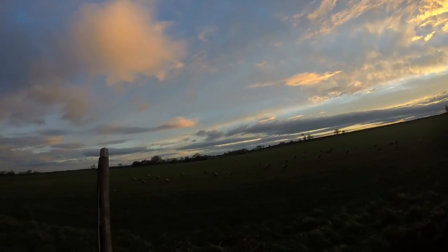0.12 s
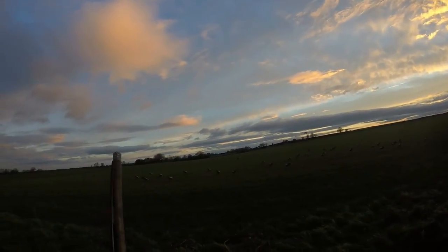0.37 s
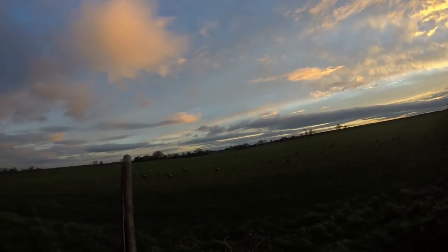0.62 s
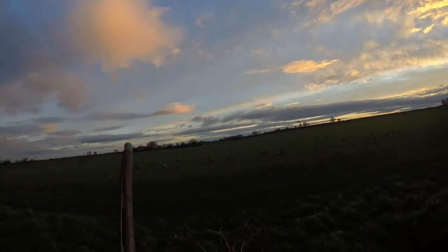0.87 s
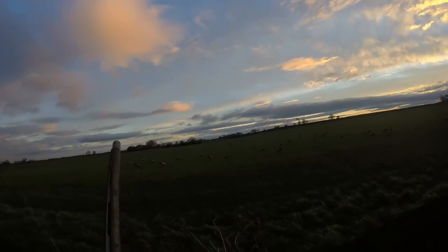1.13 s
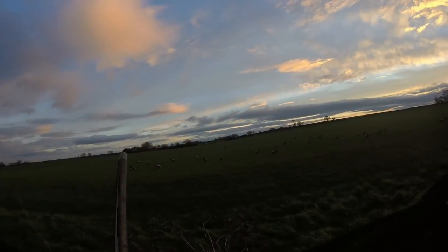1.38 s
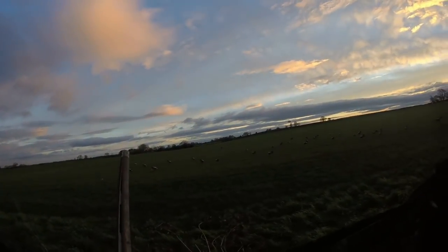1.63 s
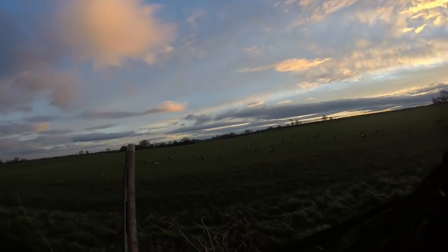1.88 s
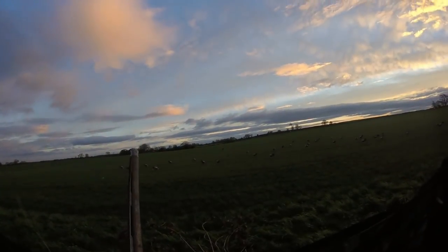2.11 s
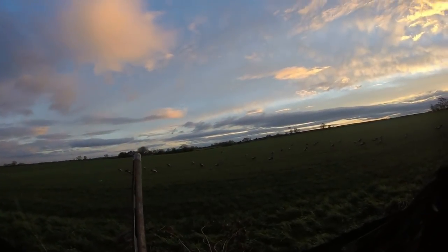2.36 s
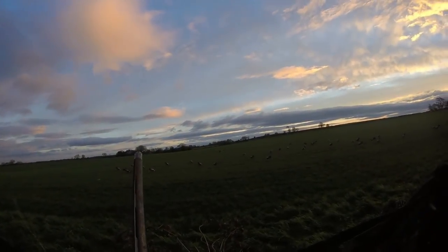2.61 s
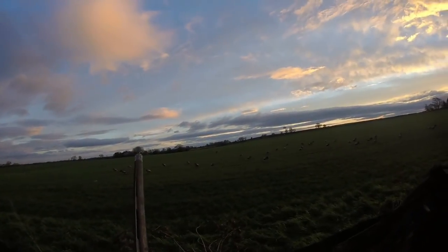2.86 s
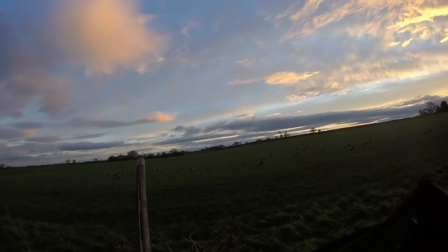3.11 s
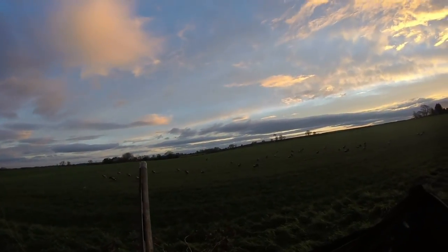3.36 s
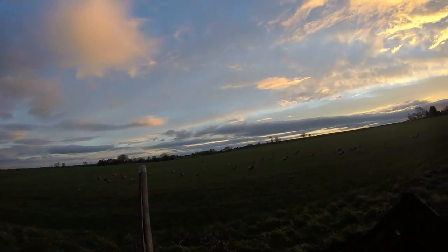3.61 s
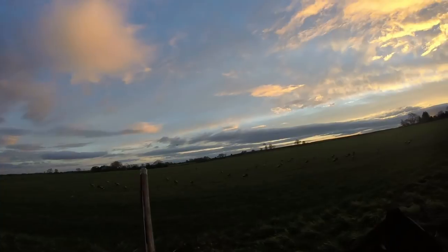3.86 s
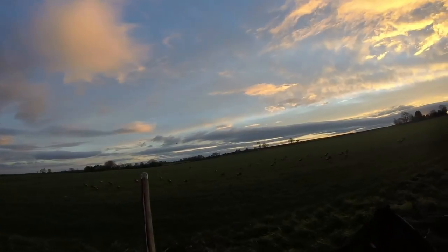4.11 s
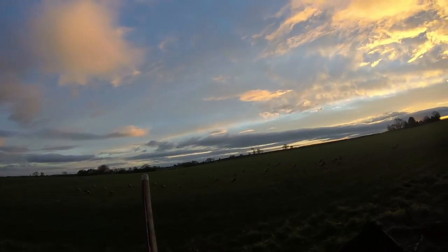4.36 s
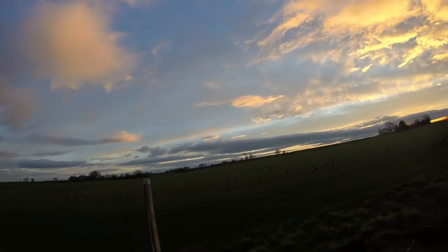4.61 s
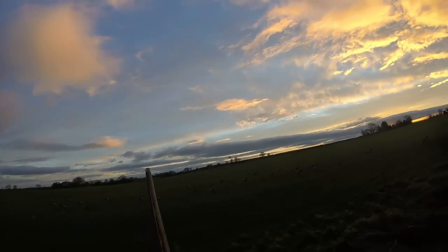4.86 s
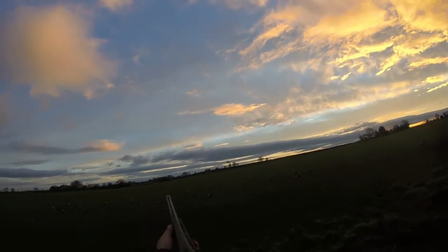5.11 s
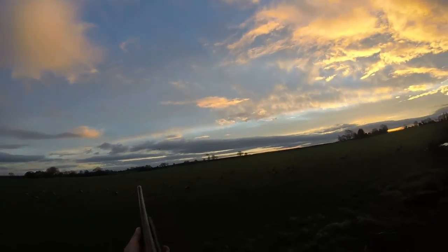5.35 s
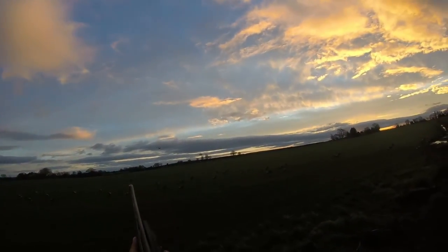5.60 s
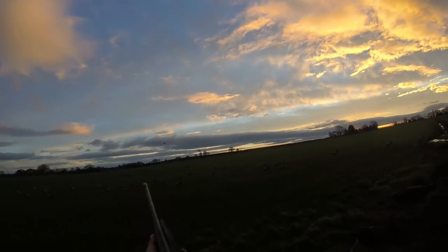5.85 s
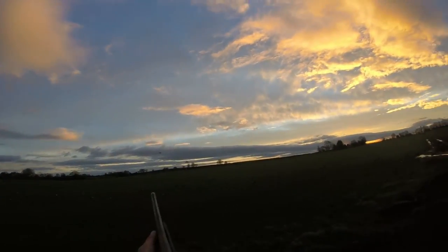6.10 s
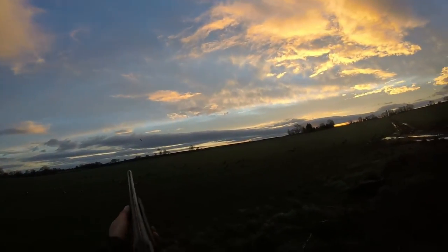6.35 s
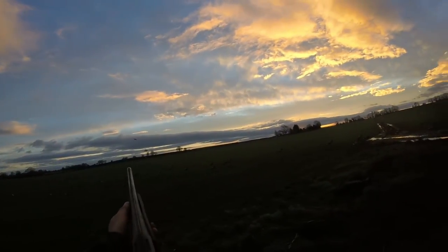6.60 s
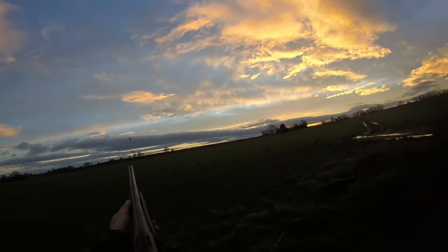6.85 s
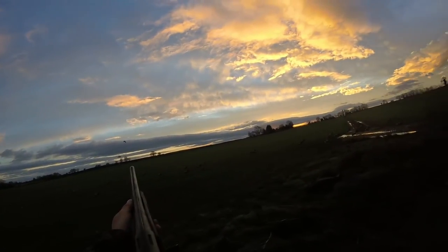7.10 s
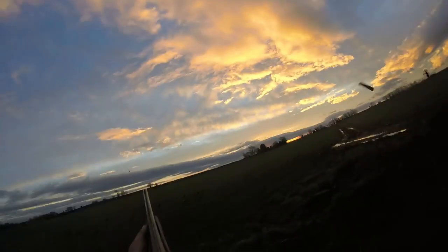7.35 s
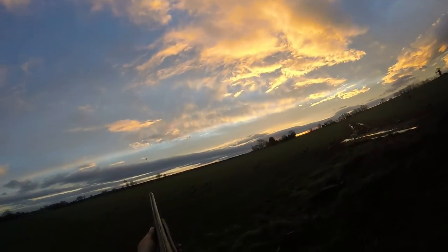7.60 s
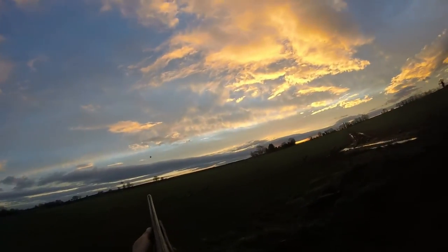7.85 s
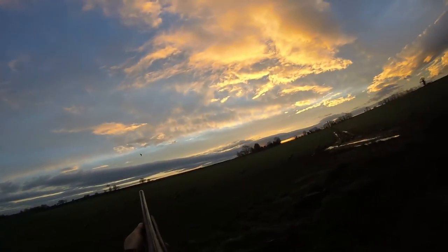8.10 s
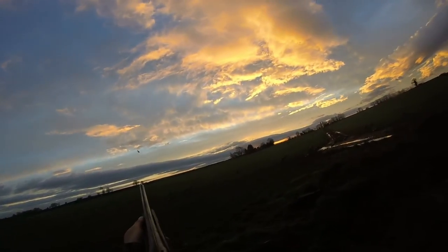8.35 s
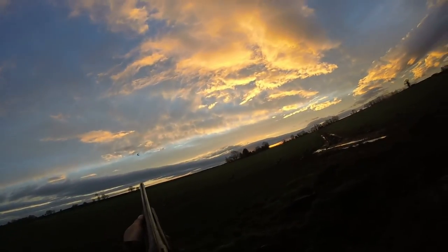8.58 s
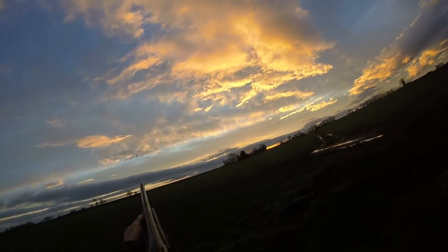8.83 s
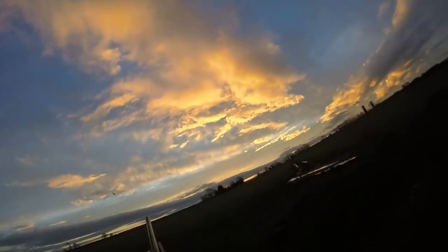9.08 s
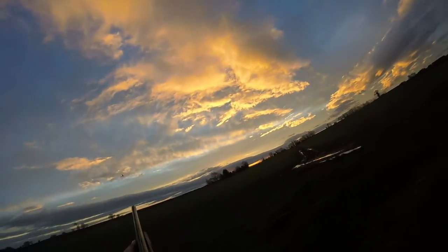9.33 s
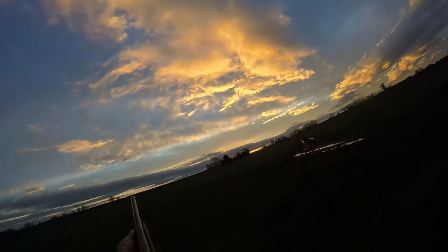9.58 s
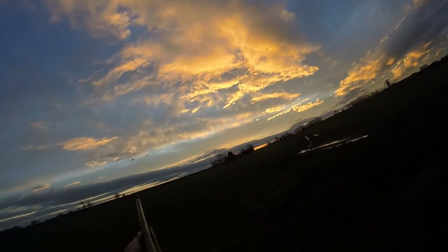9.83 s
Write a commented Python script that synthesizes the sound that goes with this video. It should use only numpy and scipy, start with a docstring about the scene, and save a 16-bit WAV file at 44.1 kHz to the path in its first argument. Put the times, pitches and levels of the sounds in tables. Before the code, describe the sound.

The tail of a honk opens, then clean nasal goose-call notes sound close by, alone and in a quick pair, gradually quieter. Wind bumps the microphone outdoors over a faint distant rumble and hiss. A gun part clicks, then a loud dry shot cracks with rattling metal, one weak honk follows, and a second shot ends the action, leaving a quiet field.

```python
"""High two-note honks of a reed goose call blown close by: drifting partials on one gliding pitch. Two shots
are a sharp front, housing rings, an echo and a decaying roll; the gun's action clatters as scraped damped modes
and the recoil jolts the housing. Behind them lie an open field's hiss, cloth rustle and gusts of wind on the
microphone, whose gain control ducks after the shots overload it."""
import sys
import numpy as np
from scipy import signal
from scipy.fft import rfft, irfft
from scipy.io import wavfile
from scipy.ndimage import uniform_filter1d

SR = 44100
rng = np.random.default_rng(int(sys.argv[2]) if len(sys.argv) > 2 else 0)


def volts_from_decibels(level):
    """Turn decibel levels (scalar or array-like) into linear amplitude factors."""
    exponent = np.asarray(level, float) / 20
    return 10 ** exponent


def dump(signal):
    """Clip the signal to [-1, 1] and save it as 16-bit WAV at the path in sys.argv[1]."""
    limited = np.clip(np.atleast_2d(signal).T, -1, 1)
    pcm = np.round(limited * 32767).astype(np.int16)
    wavfile.write(sys.argv[1], SR, pcm)


N = 439236
T = np.arange(N) / SR

# first note, pitch flips up and lands: start_s, top_s, landed_s, top_hz (target of second partial), level_db
FLIPS = [(1.123, 1.165, 1.183, 1700, -6.5), (2.808, 2.836, 2.882, 1800, -8.5),
         (3.1, 3.123, 3.174, 1742, -9), (4.182, 4.216, 4.233, 1800, -8), (5.335, 5.37, 5.393, 1745, -10.5),
         (6.42, 6.453, 6.48, 1775, -12), (8.15, 8.18, 8.213, 1640, -19)]
# second note: slur_s, end_s, top_hz (target of second partial), level_db,
# lost_share (pressure lost in the slur; over 1 the reed stops and starts afresh)
SWELLS = [(-.05, .068, 1600, -9, .5), (1.208, 1.34, 1602, -8, .52), (2.92, 3.051, 1628, -8, .33),
          (3.223, 3.316, 1578, -10.5, 1.2), (4.272, 4.4, 1630, -7, .5), (5.43, 5.558, 1705, -11, .2),
          (6.52, 6.641, 1620, -12.5, .42), (8.267, 8.384, 1635, -17.5, 2.1)]
# low second tone arching between the notes: start_s, end_s, top_hz, level_db (at the throat resonance)
UNDERTONE = [(1.164, 1.231, 390, -31), (2.86, 2.944, 360.1, -30), (3.161, 3.233, 343.1, -31),
             (4.22, 4.294, 417, -27.5), (5.376, 5.461, 422.5, -34.5), (6.47, 6.541, 460.6, -31),
             (8.185, 8.274, 465, -29)]


def rms_one(x):
    """Scale to unit rms."""
    return x / np.sqrt(np.mean(x ** 2) + 1e-20)


def coloured(spectrum):
    """Gaussian noise shaped to a (hz, db_per_hz) spectrum, rms 1."""
    hz, db = np.transpose(spectrum)
    bins_hz = np.maximum(np.arange(N // 2 + 1) * SR / N, 1)
    shape = volts_from_decibels(np.interp(np.log(bins_hz), np.log(hz), db, left=-90, right=-90))
    return rms_one(irfft(rfft(rng.standard_normal(N)) * shape, N))


def drift(rate_hz):
    """Low-passed noise of spread 1, made at SR / 20 and interpolated."""
    r = np.exp(-40 * np.pi * rate_hz / SR)
    noise = rng.standard_normal(N // 20 + 4002)
    slow = signal.lfilter([1], [1, -2 * r, r * r], noise)[4000:]   # settled part
    return np.interp(np.arange(N) / 20, np.arange(len(slow)), rms_one(slow))


def strikes(times_s, sizes):
    """Single-sample impulses."""
    out = np.full(N, 1e-18)
    out[np.round(np.asarray(times_s) * SR).astype(int)] = sizes
    return out


def ring(clicks, hz, t60_s):
    """Damped resonator: a unit click sets a sine of height 1 ringing."""
    r, w = volts_from_decibels(-60 / (t60_s * SR)), 2 * np.pi * hz / SR
    return signal.lfilter([0, np.sin(w)], [1, -2 * r * np.cos(w), r * r], clicks)


def dying(clicks, t60_s):
    """Envelope that jumps at each click and decays exponentially."""
    return signal.lfilter([1], [1, -volts_from_decibels(-60 / (t60_s * SR))], clicks)


def through(*knots):
    """Straight lines through (times, values) knots, taken in time order."""
    s, value = np.concatenate([np.broadcast_arrays(*k) for k in knots], axis=1)
    by_time = np.argsort(s, kind="stable")
    return np.interp(T, s[by_time], value[by_time])


def blowing():
    """Reed under breath pressure: pitch, level, slack, and the times and levels of its starts."""
    start, top, landed, flip_hz, first_db = np.transpose(FLIPS)
    slur, end, swell_hz, second_db, lost = np.transpose(SWELLS)
    stops = lost > 1
    restart_s, climb_s, swell_s = .016, .045, .029   # a stopped reed comes back fast
    climbed = slur + np.where(stops, restart_s, climb_s)
    swollen = slur + np.where(stops, restart_s, swell_s)

    # pitch of the second partial
    start_hz, land_hz, slur_hz, end_hz = 1572, 1572, 1532, 1505
    attack_s, fall_s, arch_hz_per_s = .006, .018, 1200
    bow_share, sag_share = .38, .5   # height reached midway up; height left midway to the end
    leaves = np.maximum(landed - fall_s, top + .001)
    shoulder_hz = flip_hz - arch_hz_per_s * (leaves - top)   # a held flip is rounded
    second_hz = through(
        (start + attack_s / 2, start_hz), (start - attack_s, start_hz),
        ((start + top) / 2, start_hz + bow_share * (flip_hz - start_hz)),
        (top, shoulder_hz), ((top + leaves) / 2, flip_hz), (leaves, shoulder_hz),
        (landed, land_hz), (slur, slur_hz), (climbed, swell_hz),
        ((climbed + end) / 2, end_hz + sag_share * (swell_hz - end_hz)), (end, end_hz))
    second_hz = uniform_filter1d(second_hz, size=400)   # the reed bends smoothly

    hold_s, release_s, spent_share = .045, .012, .55   # share left when the release begins
    pressure = through(
        (start - attack_s / 2, 0), (start + attack_s / 2, .8), (start + 2 * attack_s, 1),
        (landed, 1), (slur, 1 - lost), (slur[stops] + attack_s, .8),
        (swollen, 1), (swollen + hold_s, 1), (end - release_s, spent_share),
        (end - release_s / 3, spent_share / 5), (end + .003, 0))

    # the top of a quick flip pinches the tone, a held one less
    choke_from_hz, choke_db_per_hz, choke_eases_s, choke_s = 1600, -0.047, .02, .0079
    excess_hz = np.maximum(flip_hz - choke_from_hz, 0)
    deepest_db = choke_db_per_hz * np.exp((top - leaves) / choke_eases_s) * excess_hz
    choke_db = through((start, 0), (top - choke_s, 0), (top, deepest_db),
                       (leaves, deepest_db), (leaves + choke_s, 0))
    note_db = through((start, first_db), (landed, first_db), (swollen, second_db), (end, second_db))
    loudness_law = .9   # amplitude as a power of the pressure above threshold
    level = volts_from_decibels(note_db + choke_db) * np.maximum(pressure, 0) ** loudness_law
    level = uniform_filter1d(level, size=130)
    slack = 1 - np.clip(pressure, 0, 1)

    break_lead_s = .009
    starts = np.append(start, slur[stops]) - break_lead_s
    return second_hz / 2, level, slack, starts, np.append(first_db, second_db[stops])


def undertone():
    """Sine on a skewed pitch arch, loudest at the throat resonance; also returns its span."""
    foot_hz, throat_hz = 205, 260
    out, span, grain = np.zeros(N), np.zeros(N), drift(70)
    for start, end, top_hz, db in UNDERTONE:
        at = slice(round(start * SR), round(end * SR))
        u = np.linspace(-1, 1, at.stop - at.start)
        hz = top_hz - (top_hz - foot_hz) * u ** 2 * (1 + 0.17 * u)   # ends lower than it starts
        throat_db = -13 * np.abs(np.log2(hz / throat_hz)) + 2.4 * grain[at]
        span[at] = 1 - u ** 6
        sine = np.sin(2 * np.pi * np.cumsum(hz) / SR)
        out[at] = volts_from_decibels(db + throat_db) * span[at] * np.sqrt(2) * sine
    return out, span


def honks():
    """Partials on one pitch, rough at starts, after flip tops and with the undertone; air at reed starts."""
    # multiple, level_db
    partials = [(1, -20), (2, 0), (3, -25), (4, -30), (5, -47.5), (6, -44.5), (7, -42.5), (8, -44),
                (9, -52), (10, -50), (11, -55), (12, -51), (13, -59), (14, -62)]
    # noise in the tone: hz, db_per_hz
    rasp_colour = [(150, -27), (500, -0.5), (1600, 5), (2300, -6), (3400, -19), (6000, -28.5),
                   (12000, -34.5), (15500, -36.5)]
    # per honk, as the caller turns: level_db of all other partials against the second
    aside_by_honk_db = [0, -3, -0.5, -0.1, -1, -2.5, 1, 3.5]
    # peak and dip the third partial glides through: hz, width_hz, gain_db
    bore = [(2340, 90, 2.5), (2468, 90, -11)]

    pitch_hz, level, slack, starts, start_db = blowing()
    ends = np.transpose(SWELLS)[1]
    aside_db = np.take(aside_by_honk_db, np.searchsorted(ends, T), mode="clip")
    low, span = undertone()

    rough = 0.54 * span
    rough += dying(strikes(np.transpose(UNDERTONE)[1] - .012, 0.78), .06)
    rough += dying(strikes(np.transpose(FLIPS)[1], 0.38), .1)
    rough += dying(strikes(starts, 0.89), .12)
    rough = np.clip(rough, 0, 1)

    jitter = 0.0024 * drift(65) + 0.013 * rough * drift(250)   # blurs upper partials most
    phase = 2 * np.pi * np.cumsum(pitch_hz * (1 + jitter)) / SR
    sum_tones = 1 + signal.hilbert(low)   # each partial gains a neighbour one undertone higher
    slack_dulls_db = -8   # partials above the fourth, as pressure goes
    faint_top = [(k, -61) for k in range(15, 20)]
    tone = 0
    for k, db in partials + faint_top:
        waver_db = (.6 if k < 3 else 3 if k < 5 else 4) * drift(22)   # upper partials come and go
        bore_db = sum(gain_db * np.exp(-((k * pitch_hz - hz) / width_hz) ** 2)
                      for hz, width_hz, gain_db in bore)
        flutter_depth = .03 if k < 4 else .2 if k < 5 else .7
        flutter = 1 + flutter_depth * (rough + .3) * drift(250)
        partial_db = db + waver_db + bore_db + (k != 2) * aside_db + (k > 4) * slack_dulls_db * slack
        turn = np.exp(1j * (k * phase + rng.uniform(0, 2 * np.pi)))
        tone = tone + volts_from_decibels(partial_db) * flutter * np.sqrt(2) * np.imag(turn * sum_tones)

    unrest_db = 15 * rough + 2 * drift(80)
    rasp = volts_from_decibels(-45 + unrest_db) * coloured(rasp_colour)

    break_db = -12.5   # air breaking through at reed starts, against the note
    air = uniform_filter1d(strikes(starts, volts_from_decibels(start_db + break_db)), size=12)   # soft, not a click
    puff = uniform_filter1d(dying(air, .11), size=200)
    breaks = ring(air, 1560, .02) + 0.61 * puff * coloured(rasp_colour)
    return level * (tone + rasp) + low + breaks


def far_echo(x):
    """Hedges and ground return a short wash: convolution with decaying noise of unit energy."""
    length = np.arange(round(.6 * SR))
    wash = rng.standard_normal(len(length)) * volts_from_decibels(-60 * length / SR / .24)   # t60 .24 s
    return signal.fftconvolve(x, wash / np.linalg.norm(wash))[:N]


def shots():
    """Sharp rise, deep swing ringing the housing, ground echo, roll, and a rattle until the action closes."""
    # time_s, level_db, action_closes_s, field_roll_db (against the shot)
    shot_table = [(7.4466, 11, 7.602, -38), (9.132, 13.5, 9.272, -59.5)]
    # ring of the housing: hz, level_db, t60_s
    housing = [(425, 2.5, .014), (1630, -1, 0.011), (2720, -12.5, 0.0089)]
    # noise of rattle and roll: hz, db_per_hz
    tail_colour = [(88, -35), (150, -5.5), (433, 2), (728, -17.5), (1770, -15), (2310, -21), (6180, -24.5),
                   (15000, -40)]

    at, db, closes, roll_db = np.transpose(shot_table)
    front = strikes(at, volts_from_decibels(db))
    crackle = signal.lfilter([.4], [1, -.6], rng.standard_normal(N))
    burst = uniform_filter1d(dying(strikes(at + .0013, volts_from_decibels(db)), .022), size=170)
    out = volts_from_decibels(-24) * ring(front, 210, .0063) + volts_from_decibels(-15) * burst * crackle
    for (hz, mode_db, t60_s), late_s in zip(housing, (.0017, .0032, .004)):
        out -= volts_from_decibels(mode_db) * ring(strikes(at + late_s, volts_from_decibels(db)), hz, t60_s)
    out += volts_from_decibels(-30) * ring(strikes(at + .011, volts_from_decibels(db)), 400, .05)   # ground echo

    cycling = sum((T > s) & (T < end) for s, end in zip(at, closes))
    cycling = uniform_filter1d(cycling * 1., size=200)
    loudness = volts_from_decibels(-14.5) * dying(front, .055) + volts_from_decibels(-38.5) * dying(front, 1.2) * cycling
    rattle = loudness * coloured(tail_colour) * volts_from_decibels(4 * drift(120))
    dull_noise = signal.lfilter([.3], [1, -.75], coloured(tail_colour))
    roll = dying(strikes(at, volts_from_decibels(db + roll_db)), 1) * dull_noise
    return out + roll + rattle


def action():
    """Metal gun parts click: short scrapes into damped modes, and a thin part rings on."""
    # time_s, level_db, brightness_db_per_octave
    clicks = [(5.438, -27.5, -7.5), (6.2523, -48, -9), (6.2706, -44.5, -15), (6.2817, -33, -16),
              (6.306, -45.5, -12), (7.5505, -33, -10.5), (7.583, -18.5, 11.5), (7.5911, -21.5, 9),
              (7.727, -45, -6), (7.762, -36, -6), (8.709, -39, -15), (9.2374, -19.5, 0), (9.2501, -20, 8),
              (9.2583, -17, 4.5), (9.4135, -51, -10.5)]
    # hz, level_db, t60_s
    modes = [(452, -7, 0.0076), (1720, 2, 0.0072), (2800, 0.5, 0.0038), (4300, -9.5, 0.0024),
             (5774, -8.5, 0.0066), (8320, -13, 0.0012)]
    # thin part: hz, level_db, t60_s
    ping = [(4900, -52, 0.6), (9000, -47, 0.2)]
    ping_s = 7.593

    at, db, bright_db = np.transpose(clicks)
    chance_db = rng.normal(0, 1.9, (len(at), len(modes)))
    grit, out = rng.standard_normal(N), np.zeros(N)
    for k, (hz, mode_db, t60_s) in enumerate(modes):
        tilt_db = bright_db * np.log2(max(hz, 1650.) / 3000)
        sizes = volts_from_decibels(db + mode_db - 11.5 + tilt_db + chance_db[:, k])
        scrape = grit * uniform_filter1d(dying(strikes(at, sizes), .023), size=40)
        out += ring(scrape, hz, t60_s)
    return out + sum(ring(strikes([ping_s], volts_from_decibels(db)), hz, t60_s) for hz, db, t60_s in ping)


def jolts():
    """Recoil: a dull knock, then the housing sways two or three times at a low pitch and settles."""
    # time_s, sway_db, knock_db
    recoils = [(7.557, -0.5, 3.5), (9.268, -8.5, 17.5)]
    sway_hz, sway_s, knock_hz, knock_t60_s = 40.7, .063, 99, .026
    at, sway_db, knock_db = np.transpose(recoils)
    out = ring(strikes(at - .004, volts_from_decibels(knock_db)), knock_hz, knock_t60_s)
    for s, db in zip(at, sway_db):
        since = np.maximum(T - s, 0)
        out -= volts_from_decibels(db) * np.exp(-(since / sway_s) ** 3) * np.sin(2 * np.pi * sway_hz * since)
    return out


def field():
    """Shaped noises: lumpy wind on the port, far traffic and hiss, cloth rustle."""
    # time_s, level_db, half_length_s
    gust_table = [(0.39, -31.5, 0.36), (1.07, -28.5, 0.13), (1.397, -34.5, .2), (1.905, -29.5, .22),
                  (2.7, -39.5, .3), (3.107, -21.5, 0.049), (3.45, -28.5, 0.27), (4.457, -35, 0.36),
                  (5.365, -32, 0.15), (6.0, -37.5, 0.45), (6.432, -29, .2), (7.202, -39, 0.27),
                  (8.494, -37.5, 0.36), (9.91, -44.5, 0.185)]
    # hz, db_per_hz
    wind_colour = [(12, -27), (20, 0.5), (47, -3), (99, -16.5), (147, -23), (221, -39), (300, -43),
                   (390, -75), (660, -120)]
    # far traffic and hiss: hz, db_per_hz
    far_colour = [(120, -31), (200, -3), (332, -10), (451, -5), (696, -15), (1410, -20.5), (1690, -21),
                  (5660, -33.5), (12300, -43), (15000, -48)]
    # cloth: time_s, half_length_s, level_db
    rustles = [(5.236, .1, -60.5), (5.761, .06, -64.5), (6.152, 0.071, -63), (9.37, .03, -70)]
    calm_db, far_db = -49, -55

    gusts = volts_from_decibels(calm_db) + sum(volts_from_decibels(db) * np.exp(-((T - s) / half) ** 2) for s, db, half in gust_table)
    wind = gusts * coloured(wind_colour) * volts_from_decibels(4.2 * drift(27))
    far = volts_from_decibels(far_db + 1.3 * drift(5.7)) * coloured(far_colour)
    swell = sum(volts_from_decibels(db) * np.exp(-((T - s) / half) ** 2) for s, half, db in rustles)
    cloth = coloured([(600, -6.5), (2000, 7), (5500, -3), (9000, -11), (13000, -22.5)])
    return wind + far + swell * cloth * volts_from_decibels(2.6 * drift(60))


def scene():
    """Sum of all sources at one microphone."""
    calls = honks()
    mix = calls + volts_from_decibels(-35.5) * far_echo(calls) + shots() + action() + jolts() + field()
    return mix[None]


def band_limit(x):
    """A steep low-pass at the top of the band."""
    return signal.sosfilt(signal.butter(12, 15710, fs=SR, output="sos"), x)


def record(dry):
    """Dull microphone: gain control ducks fast and recovers slowly; what is faster overloads."""
    threshold_db, release_db_per_s, duck_s = 1.5, 11, .014
    over_db = np.maximum(20 * np.log10(np.abs(dry) + 1e-9) - threshold_db, 0)
    release_db = release_db_per_s * T
    held_db = np.maximum.accumulate(over_db + release_db, axis=1) - release_db
    r = np.exp(-1 / (duck_s * SR))
    duck_db = signal.lfilter([1 - r], [1, -r], held_db)
    ducked = np.clip(dry * volts_from_decibels(-duck_db), -.98, .98)
    order, cut_hz = 3, 11500
    mix = signal.lfilter(*signal.butter(order, cut_hz, fs=SR), ducked)
    return band_limit(mix)


dry = scene()
out = record(dry)
dump(out)
```